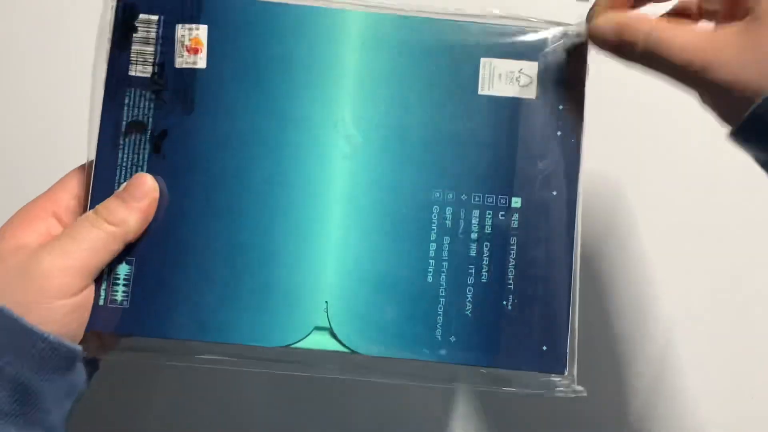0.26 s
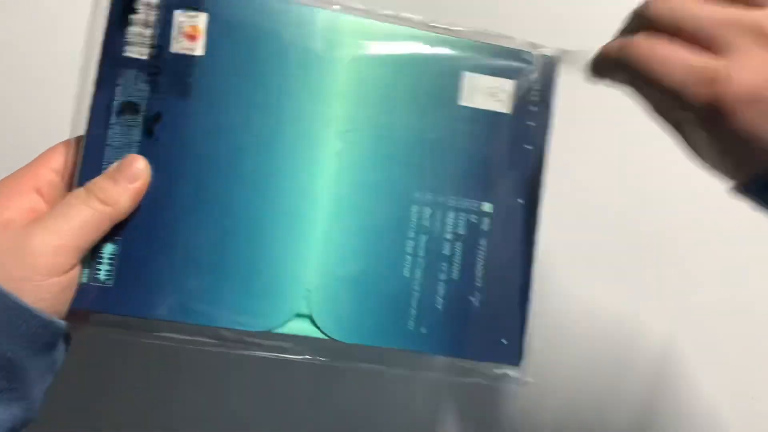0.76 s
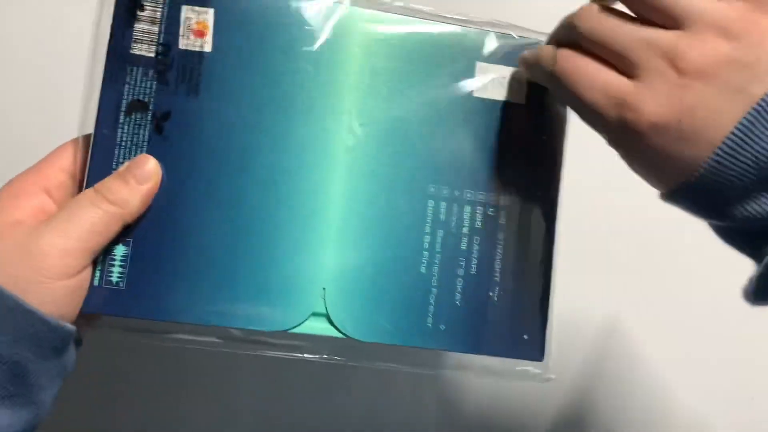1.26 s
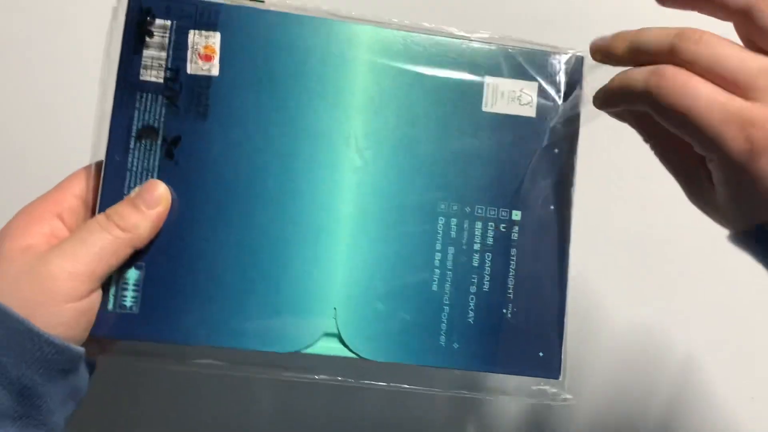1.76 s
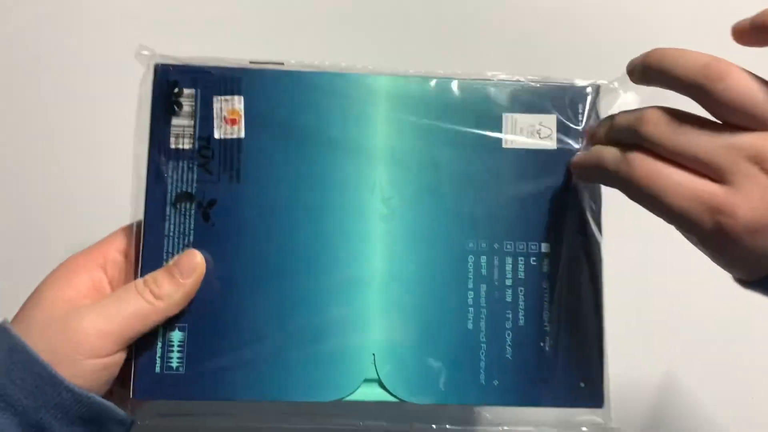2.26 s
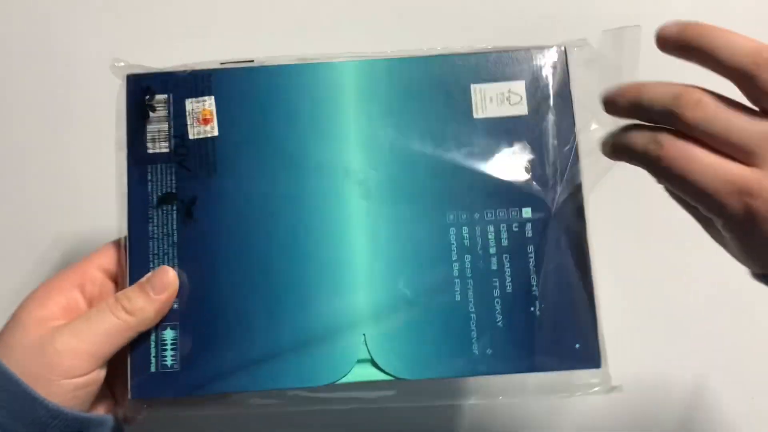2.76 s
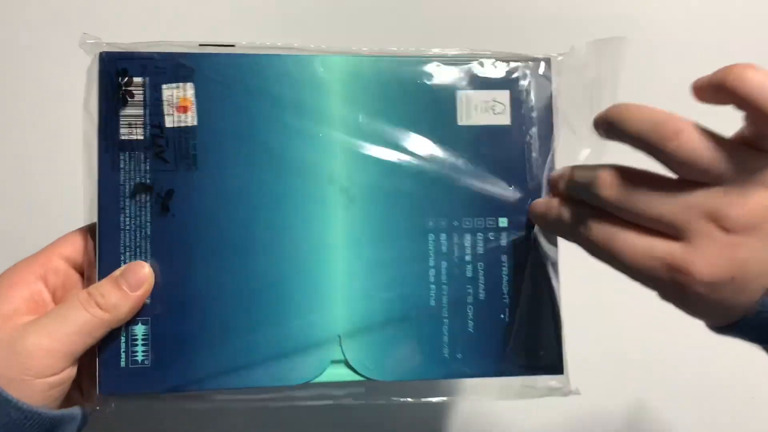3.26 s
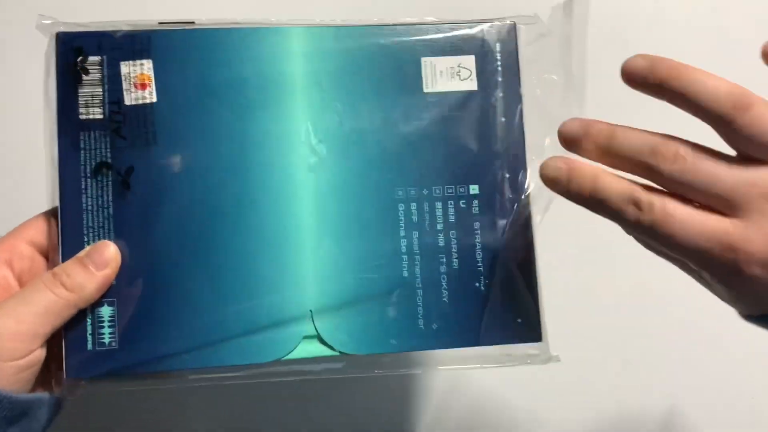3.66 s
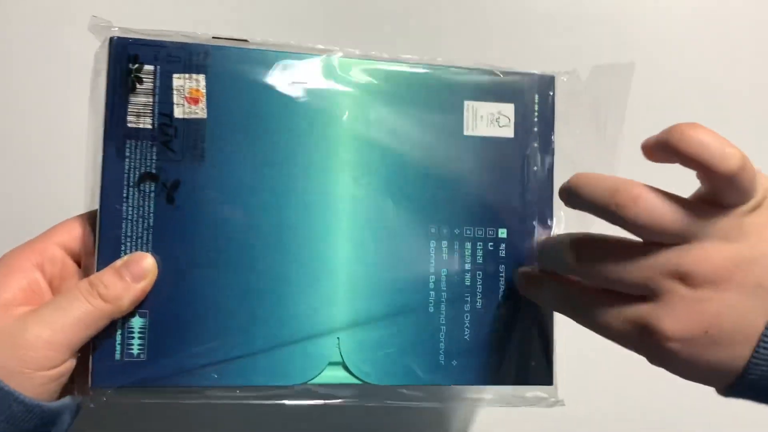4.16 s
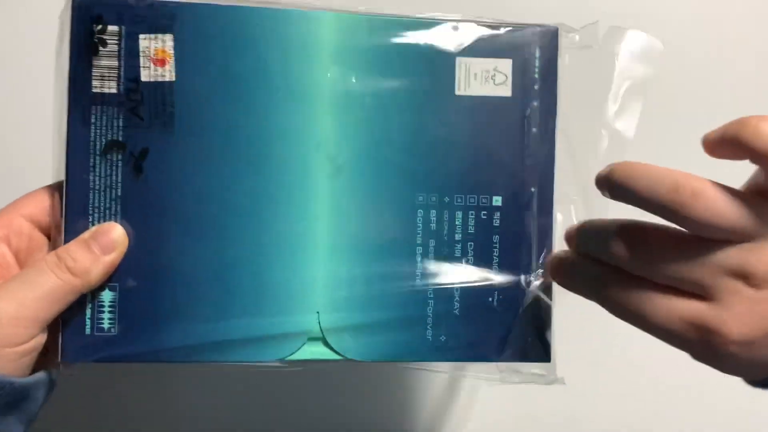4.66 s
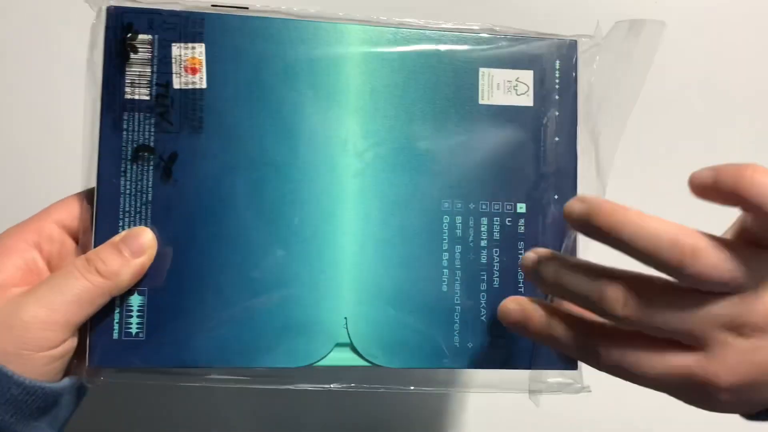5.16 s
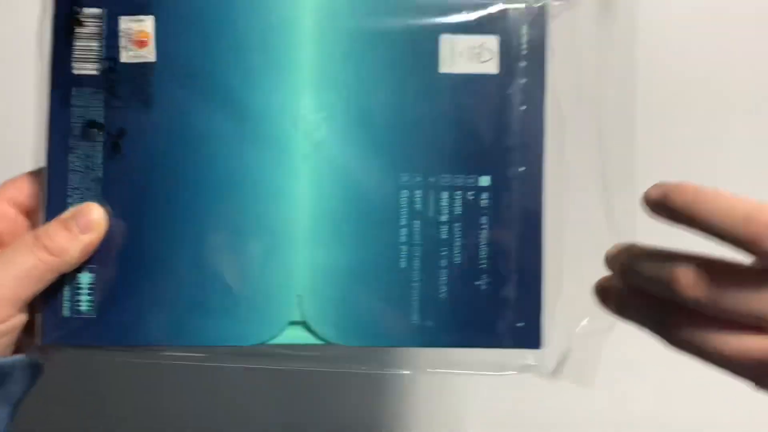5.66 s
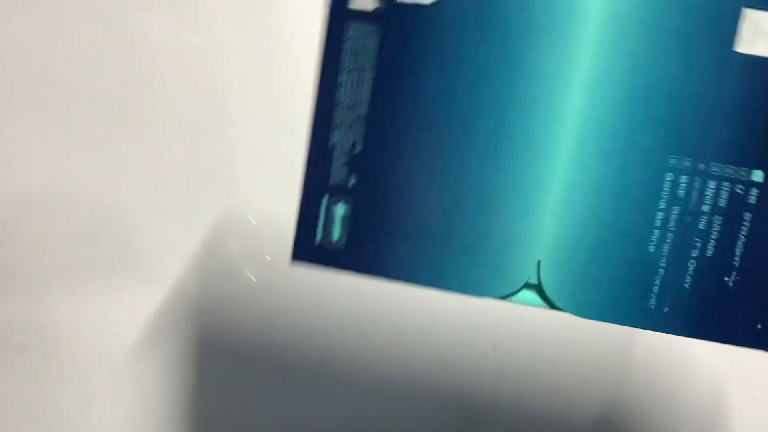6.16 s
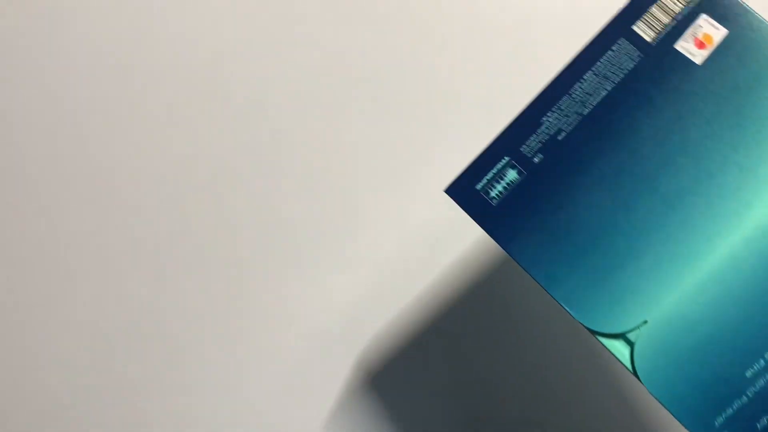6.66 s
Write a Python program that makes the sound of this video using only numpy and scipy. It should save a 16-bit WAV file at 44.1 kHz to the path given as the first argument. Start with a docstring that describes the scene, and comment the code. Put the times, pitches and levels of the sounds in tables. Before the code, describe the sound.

Thin stiff plastic film crackles and snaps sharply close up as a sticky flap is tugged open bit by bit, then card slides out.

```python
"""A quiet room, close up: a hand peels the glued flap of a thin plastic sleeve off a card booklet, tug by tug.
Every buckling crease is a short burst of noise; glue letting go packs them into crackle, and snaps stand out.
The booklet answers dully, flat film patches and the hollow pocket ring, and lifting film pops.
Later the card rubs its way out of the sleeve. Two low hand bumps and a faint room tone lie underneath.
A small dry room adds a short tail, and the loudest peaks clip."""
import sys
import numpy as np
from scipy import signal
from scipy.fft import rfft, irfft, next_fast_len
from scipy.io import wavfile
from scipy.ndimage import uniform_filter1d

SR = 44100
rng = np.random.default_rng(int(sys.argv[2]) if len(sys.argv) > 2 else 0)


def materialize(psi):
    """Save the field psi as 16-bit PCM at rate SR to the path in sys.argv[1].

    A 1-D psi becomes a single channel; in a 2-D psi each row is a channel.
    """
    bounded = np.clip(np.atleast_2d(psi).T, -1, 1)
    quanta = np.round(bounded * 32767).astype(np.int16)
    wavfile.write(sys.argv[1], SR, quanta)


N = 305170

# Drift of the room tone: (time [s], level [dB])
ROOM_LEVEL = [(0.0, -44.5), (0.7, -55.5), (1.4, -65), (2.0, -53.5), (3.4, -58), (4.7, -68), (5.4, -54.5),
              (6.8, -65)]
# Spectrum of the room tone: (frequency [Hz], relative level per Hz [dB])
ROOM_SPECTRUM = [(45, 2.5), (125, 1.5), (400, -12.5), (1500, -67), (5000, -19), (16000, -36)]
# Low bumps of the hands on the booklet: (time [s], peak level [dB])
HAND_BUMPS = [(0.632, -27), (0.747, -29)]
# The booklet slides out of the sleeve: (time [s], level [dB] before the roughness)
SLIDE_LEVEL = [(5.85, -44), (6.09, -52), (6.13, -31), (6.3, -37), (6.45, -51), (6.7, -38.5), (6.92, -43)]
# Spectrum of card rubbing on film: (frequency [Hz], relative level per Hz [dB])
RUB_SPECTRUM = [(500, -13.5), (1150, -18), (2400, 0.5), (3600, -5), (16000, -13.5)]
# Hollow pops where the film lifts off the cover: (time [s], level before trim [dB], pitch [Hz])
LIFT_POPS = [(1.3, -17, 1333), (1.776, -24.5, 840), (2.185, -17, 1760), (3.098, -31.5, 754.9),
             (3.386, -23, 727), (3.524, -40, 564.7), (3.542, -36.5, 589.3), (3.602, -38.5, 310),
             (3.7257, -30.5, 642.3), (4.645, -25.5, 758.6), (4.67, -26.5, 638.3), (5.527, -26, 612.6),
             (5.724, -29.5, 550), (5.799, -24, 910.1)]
# Modes of the hollow pocket between film and cover: (frequency [Hz], relative level [dB])
POCKET_MODES = [(420, -6), (640, 0), (1047, -5), (1700, -1)]
# Tugs on the flap: (full pull reached [s], held [s], crackle level before trim [dB])
FLAP_TUGS = [(0.021, 0.061, -15.5), (0.149, 0.062, -37), (0.224, .07, -27), (0.34, 0.042, -24),
             (0.432, 0.13, -28), (0.54, 0.041, -25), (0.63, 0.067, -14.5), (0.739, 0.028, -20.5),
             (0.87, 0.03, -39), (1.166, 0.047, -24), (1.256, 0.015, -15), (1.305, 0.03887, -9),
             (1.473, 0.074, -33), (1.58, 0.0908, -36), (1.743, 0.018, -23), (1.795, 0.02, -13),
             (2.007, 0.058, -19.5), (2.121, 0.043, -29), (2.18, 0.035, -11), (2.312, 0.07, -22),
             (2.42, 0.0462, -26), (2.513, 0.057, -18), (2.618, 0.042, -13), (2.754, 0.064, -28),
             (3.031, 0.0794, -31), (3.183, 0.027, -20.5), (3.243, 0.048, -11), (3.383, 0.09, -18.5),
             (3.529, 0.086, -34.5), (3.608, 0.0256, -28), (3.69, 0.08, -47), (3.872, 0.025, -24),
             (3.95, 0.13, -35.5), (4.133, 0.045, -21), (4.374, 0.099, -18), (4.583, 0.125, -17.5),
             (4.84, 0.03, -33), (4.883, 0.095, -19), (5.128, 0.047, -28), (5.309, 0.029, -19.5),
             (5.345, 0.0316, -14), (5.53, .15, -13.5), (5.799, 0.046, -21), (5.902, 0.116, -42),
             (6.13, 0.088, -20), (6.319, 0.02193, -25.5), (6.51, 0.12, -43), (6.688, 0.06, -29.5),
             (6.829, 0.1, -38)]
# Single creases snapping: (time [s], level before trim [dB])
CREASE_SNAPS = [(0.0339, -10), (0.057, 1.5), (0.0715, -3.5), (0.0829, 4.5), (0.2162, -18), (0.2308, -16),
                (0.265, 0), (0.2852, -18), (0.334, -7.5), (0.35, 3.5), (0.4145, -6), (0.4341, -8.5),
                (0.4788, -7.5), (0.539, -7), (0.569, -5.5), (0.5892, -3), (0.625, 3), (0.6387, -3),
                (0.745, -1), (0.885, -13.5), (0.9149, -8), (1.1475, -5.5), (1.1825, -13), (1.1943, -2.5),
                (1.2647, 2.5), (1.2858, -5), (1.3615, -11), (1.4996, -12), (1.5571, -2), (1.625, -11.5),
                (1.6908, -15), (1.7335, -1.5), (1.7481, 3), (1.777, -2.5), (1.8041, 1), (1.9856, -10),
                (2.0532, -3), (2.119, -3), (2.15, -2.5), (2.2122, -1.5), (2.295, -3.5), (2.3239, 4),
                (2.367, -1), (2.503, -3.5), (2.5201, -1.5), (2.5652, -1), (2.5946, -1), (2.6231, 6),
                (2.6916, 0.5), (2.744, -8), (2.905, -19.5), (2.923, -13), (2.944, -10.5), (3.025, -13),
                (3.181, -4.5), (3.2965, -7.5), (3.3581, -12), (3.3863, 0), (3.411, -1), (3.4243, -5),
                (3.438, 0.5), (3.4468, -1), (3.468, -17), (3.6072, -5.5), (3.7243, -16), (3.7732, -28),
                (3.851, -16), (3.9763, -32), (4.0157, -9), (4.096, -18.5), (4.1087, -17.5), (4.135, -6.5),
                (4.169, -5), (4.2527, -14), (4.3835, -1), (4.5465, -17), (4.584, 2), (4.647, -3),
                (4.659, -0.5), (4.7065, -30), (4.825, -21), (4.8808, -0.5), (4.918, 0), (4.9934, -14),
                (5.0315, -15.5), (5.1013, -15), (5.137, -1), (5.294, -28), (5.3429, -2.5), (5.476, 0),
                (5.4955, -0.5), (5.5074, 3), (5.526, 0), (5.5473, 0.5), (5.7772, -14), (5.803, -10.5),
                (5.8665, -22), (5.949, -41), (5.9726, -28), (6.0049, -9.5), (6.066, -18), (6.2336, -3),
                (6.328, -7.5), (6.7305, -13.5), (6.829, -15)]
# Spectra of film and booklet: (frequency [Hz], relative level per Hz [dB])
FILM_SPECTRUM = [(600, -14), (1500, -15.5), (2600, -9), (4000, -2), (5300, -8.5), (7000, 0.5), (8550, -3),
                 (9400, 2.5), (11500, -5), (14200, -14.5), (15700, 6.5), (16000, -33.5)]
BOOKLET_SPECTRUM = [(40, -32), (100, -7.5), (300, -0.5), (1200, -5.5), (2000, -9.5), (4000, -74)]
# One crease dying away: (frequency [Hz], 60 dB decay time [s])
BURST_DECAY = [(500, 0.035), (4000, 0.02), (8000, 0.007), (15000, 0.005)]
# The room dying away: (frequency [Hz], 60 dB decay time [s])
ROOM_DECAY = [(200, 0.02), (1500, 0.28), (6000, 0.082), (15000, 0.018)]
# The sleeve in stereo: (frequency [Hz], likeness of the sides [0-1], left minus right [dB])
STEREO = [(100, .95, 0), (600, .85, 1.5), (1400, .45, 2.5), (4000, .25, -1), (5500, .4, -4), (6800, .85, 0)]

BUMP_HZ, BUMP_T60_S = 124.15, 0.12      # each bump scales this pitch by a random factor
POP_CYCLES, POP_OVERTONE = 24, 2.6      # cycles to fall 60 dB; upper mode re the pitch
POCKET_T60_S = 0.055
CREASES_PER_S, MIDDLING_PULL_DB = 600, -30.5      # crackle rate at a middling pull
SPREAD_DB = 4.0      # unevenness of crease sizes
TAKE_UP_DB_PER_S, LET_GO_DB_PER_S = 650, 360      # crackle swelling into a tug, dying after it
FREED_DB = -11      # the booklet answers less once it starts to slide
ROOM_DB, RISE_SHARE = -0.5, 0.39      # reflected energy re the burst; build-up time re its decay
BASS_LEAD_S, SWAP_HZ = 0.00016, 4915      # left leads below the swap
TREBLE_LAG_S, TREBLE_TURN_RAD = 0.00021, 1.95      # left lags above it, with a phase turn
CUTOFF_HZ = 16500

SIZE = next_fast_len(N + SR)      # spectrum length, with spare time for tails
HZ = np.maximum(np.arange(SIZE // 2 + 1) * SR / SIZE, 1)
CENTRES = 125 * 2 ** np.arange(8)      # octave bands [Hz]


def from_db(db):
    """Decibels to amplitude gain."""
    return 10 ** (np.asarray(db) / 20)


def over_time(rows):
    """Level of a (time, level) table at every sample."""
    seconds, level = np.transpose(rows)
    return np.interp(np.arange(N) / SR, seconds, level)


def at_hz(points, hz, axis=1):
    """One column of a frequency table, on a log-frequency axis."""
    points = np.array(points)
    return np.interp(np.log(hz), np.log(points[:, 0]), points[:, axis])


def colour(points):
    """Gain per frequency that gives white noise this spectrum at rms 1."""
    gain = from_db(at_hz(points, HZ))
    return gain / np.sqrt(np.mean(gain ** 2))


def octave(centre):
    """Overlapping octave windows whose powers add up to one."""
    away = np.log2(np.clip(HZ, CENTRES[0], CENTRES[-1]) / centre)
    return np.cos(np.pi / 2 * np.clip(away, -1, 1))


def fading(energy, t60):
    """Spreads each packet of energy over an exponential decay, keeping its total."""
    r = from_db(-120 / (t60 * SR))      # 60 dB of energy in t60 seconds
    return signal.lfilter([1 - r], [1, -r], energy)


def ring(clicks, hz, t60):
    """A two-pole resonator: each click sets a decaying sine ringing."""
    r = from_db(-60 / (t60 * SR))
    w = 2 * np.pi * hz / SR
    return signal.lfilter([0, np.sin(w) * np.sqrt(1 - r)], [1, -2 * r * np.cos(w), r * r], clicks + 1e-18)


def room_tone(own_db):
    """Drifting rumble and faint hiss: coloured noise, nearly the same on both sides."""
    spectra = colour(ROOM_SPECTRUM) * rfft(rng.standard_normal((3, SIZE)))
    shared, left, right = irfft(spectra, SIZE)[:, :N]
    return from_db(over_time(ROOM_LEVEL)) * (shared + from_db(own_db) * np.array([left, right]))


def bumps():
    """Each hand bump is a short dull thud, a decaying low sine alike on both sides."""
    t, out = np.arange(N) / SR, np.zeros(N)
    detunes = rng.uniform(0.29, 1.559, len(HAND_BUMPS))
    for (start, db), detune in zip(HAND_BUMPS, detunes):
        age = np.maximum(t - start, 0)      # the sine stays at zero until the bump starts
        fall = from_db(db - 60 * age / BUMP_T60_S)
        out += fall * np.sin(2 * np.pi * BUMP_HZ * detune * age)
    return out


def slide(rough_db):
    """Card rubbing on film: a hiss whose level jitters with the grip."""
    jitter = uniform_filter1d(rng.standard_normal(N), size=200)
    roughness = rough_db * jitter / np.std(jitter)
    moving = np.arange(N) / SR > SLIDE_LEVEL[0][0]
    return moving * from_db(over_time(SLIDE_LEVEL) + roughness) * rng.standard_normal((3, N))


def pops(level_db, upper_db):
    """Each pop rings briefly at the pitch of the hollow it opens, with a weaker upper mode."""
    out = np.zeros(N)
    for s, db, hz in LIFT_POPS:
        start = int(s * SR)
        age = np.arange(min(SR // 8, N - start)) / SR
        fall = from_db(db + level_db - 60 * age * hz / POP_CYCLES)
        main = np.sin(2 * np.pi * hz * age)
        upper = from_db(upper_db) * np.sin(2 * np.pi * POP_OVERTONE * hz * age)
        out[start:start + len(age)] += fall * (main + upper)
    return out


def pocket(at, energy, uneven_db):
    """Each crease pops the pocket, every mode with a strength and sign of its own."""
    shape = (len(at), len(POCKET_MODES))
    strengths = from_db(rng.normal(0, uneven_db, shape)) * rng.choice([-1, 1], shape)
    out = np.zeros(N)
    for (hz, db), strength in zip(POCKET_MODES, strengths.T):
        clicks = np.bincount(at, np.sqrt(energy) * from_db(db) * strength, N)
        out += ring(clicks, hz, POCKET_T60_S)
    return out


def panels(at, energy, cycles, count):
    """Each crease sets one of several flat patches of film ringing briefly at its own pitch."""
    dealt = rng.integers(0, count, len(at))
    out = np.zeros(N)
    for patch, hz in enumerate(np.geomspace(1500, 11000, count)):
        clicks = np.bincount(at, np.sqrt(energy) * (dealt == patch), N)
        out += ring(clicks, hz, cycles / hz)
    return out


def pull():
    """Crackle level in dB: each tug swells, holds and lets go; the strongest one counts."""
    t = np.arange(0, N / SR, 0.001)
    full, held, db = np.transpose(FLAP_TUGS)[:, :, None]
    take_up = TAKE_UP_DB_PER_S * np.maximum(full - t, 0)
    let_go = LET_GO_DB_PER_S * np.maximum(t - full - held, 0)
    return np.interp(np.arange(N) / SR, t, (db - take_up - let_go).max(axis=0))


def creases(crackle_db, snap_db, body_db, pop_db):
    """Random crackle, single snaps and pops: sample, film energy and booklet energy of each."""
    pull_db = pull()
    # a harder pull frees more creases
    rate = CREASES_PER_S * from_db(0.4 * (pull_db - MIDDLING_PULL_DB))
    at = np.flatnonzero(rng.random(N) < rate / SR)
    size = from_db(SPREAD_DB * np.minimum(rng.exponential(1, len(at)), 3.5))
    # dividing by the rate leaves the crackle level to the pull
    film = size ** 2 / np.mean(size ** 2) * from_db(2 * (pull_db[at] + crackle_db)) * SR / rate[at]

    snap_s, snap_level_db = np.transpose(CREASE_SNAPS)
    at = np.append(at, (snap_s * SR).astype(int))
    film = np.append(film, from_db(2 * (snap_level_db + snap_db)))

    # hard pulls are brighter, so the booklet answers relatively less
    booklet = film * from_db(2 * (body_db - 0.13 * (pull_db[at] + 42.0)))
    booklet = booklet * from_db(2 * FREED_DB * (at > SLIDE_LEVEL[0][0] * SR))

    # pops move the cover, not the film
    pop_s, pop_level_db, _ = np.transpose(LIFT_POPS)
    pop_energy = from_db(2 * (pop_level_db + pop_db))
    at = np.append(at, (pop_s * SR).astype(int))
    return at, np.append(film, 0 * pop_energy), np.append(booklet, pop_energy)


def bursts(at, film, booklet, tint_db):
    """Burst envelope per octave for film and booklet; each crease has its own tint."""
    tints = from_db(rng.normal(0, 2 * tint_db, (len(at), len(CENTRES))))
    for hz, tint in zip(CENTRES, tints.T):
        energy = np.array([np.bincount(at, e * tint, N) for e in (film, booklet)]) + 1e-18
        decay = at_hz(BURST_DECAY, hz)
        energy = fading(energy, RISE_SHARE * decay)
        direct = fading(energy, decay)
        # reflections from table and walls
        reflected = from_db(2 * ROOM_DB) * fading(energy, at_hz(ROOM_DECAY, hz))
        yield hz, np.sqrt(direct + reflected)


def stereo(heard):
    """Blends the shared spectrum with one per side, with phase and balance set by frequency."""
    treble = 1 / (1 + (SWAP_HZ / HZ) ** 8)
    bass_turn = np.exp(2j * np.pi * HZ * BASS_LEAD_S)
    treble_turn = np.exp(1j * (TREBLE_TURN_RAD - 2 * np.pi * HZ * TREBLE_LAG_S))
    turn = (1 - treble) * bass_turn + treble * treble_turn
    alike = np.clip(at_hz(STEREO, HZ), 0, 1)
    balance_db = at_hz(STEREO, HZ, axis=2)
    shared = np.sqrt(alike) * heard[0] * [turn / abs(turn), np.ones(len(HZ))]
    own = np.sqrt(1 - alike) * heard[1:]
    return (shared + own) * from_db([balance_db / 2, -balance_db / 2])


def sleeve():
    """Noise shaped by the crease bursts, plus rubbing and ringing; spectra of left and right."""
    white = rng.standard_normal((3, N))      # one noise shared, one for each side
    at, film_energy, booklet_energy = creases(crackle_db=-7.5, snap_db=7.5, body_db=-21.5, pop_db=7.5)
    film, booklet = colour(FILM_SPECTRUM), colour(BOOKLET_SPECTRUM)
    heard = colour(RUB_SPECTRUM) * rfft(slide(rough_db=4.5), SIZE)
    for hz, (bright, dull) in bursts(at, film_energy, booklet_energy, tint_db=3.2):
        if hz > 400:
            heard = heard + octave(hz) * film * rfft(bright * white, SIZE)
        if hz < 5000:
            # reversed noise keeps the booklet independent of the film
            heard = heard + octave(hz) * booklet * rfft(dull * white[:, ::-1], SIZE)
    heard[0] += from_db(4) * film * rfft(panels(at, film_energy, cycles=55, count=44), SIZE)
    heard[0] += from_db(3) * rfft(pocket(at, booklet_energy, uneven_db=4), SIZE)
    heard[0] += rfft(pops(level_db=3.0, upper_db=-1), SIZE)
    return stereo(heard)


def scene():
    """Sleeve, room tone and hand bumps together."""
    peeling = irfft(sleeve(), SIZE)[:, :N]
    return peeling + room_tone(own_db=-11.0) + bumps()


def record(dry):
    """Cuts the deepest bass, clips peaks just under full scale, then cuts the top."""
    bass_cut = signal.butter(2, 45.0, "high", fs=SR, output="sos")
    top_cut = signal.cheby2(12, 70, CUTOFF_HZ, fs=SR, output="sos")
    clipped = np.clip(signal.sosfilt(bass_cut, dry), -0.97, 0.97)
    return signal.sosfilt(top_cut, clipped)


dry = scene()
out = record(dry)
materialize(out)
```